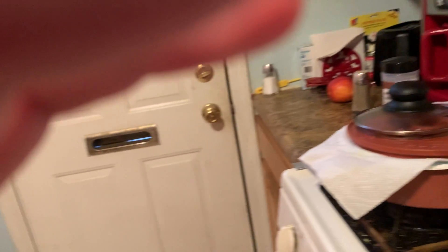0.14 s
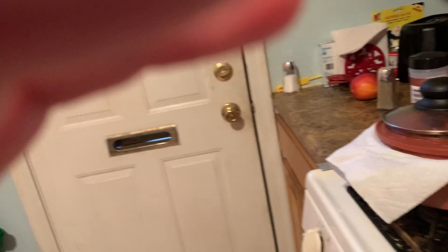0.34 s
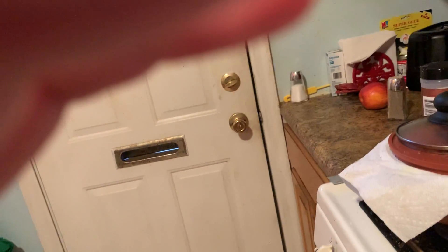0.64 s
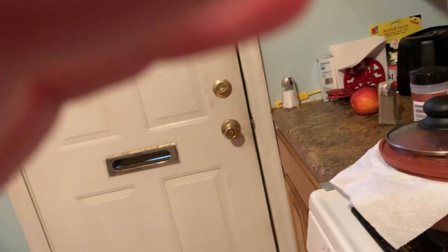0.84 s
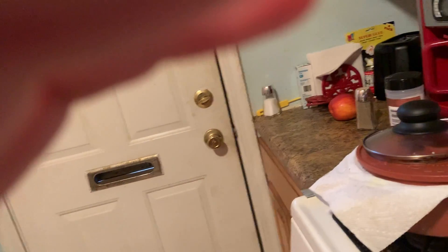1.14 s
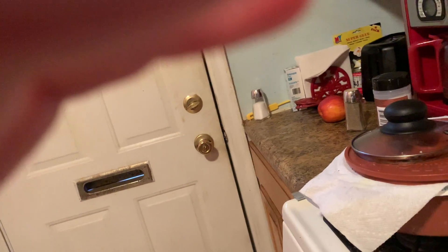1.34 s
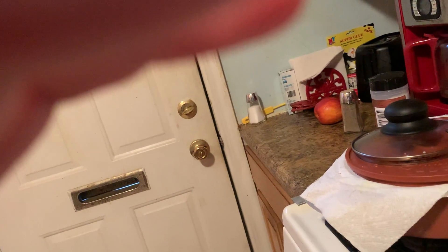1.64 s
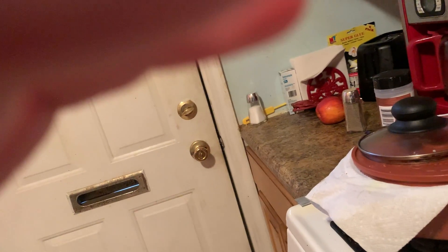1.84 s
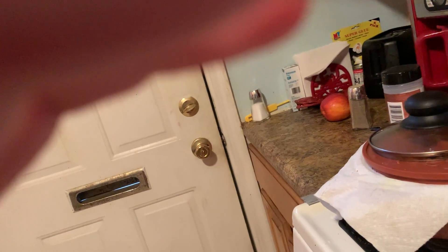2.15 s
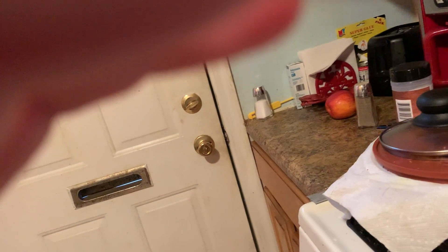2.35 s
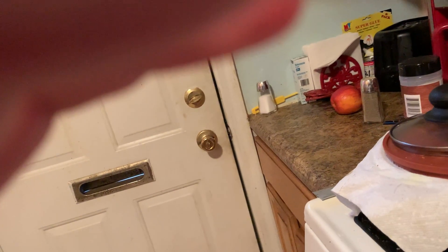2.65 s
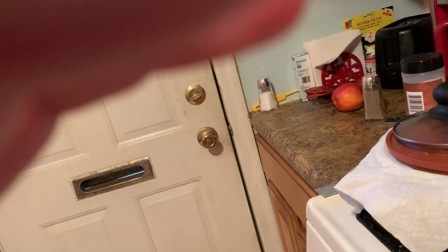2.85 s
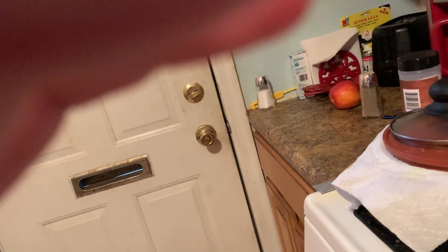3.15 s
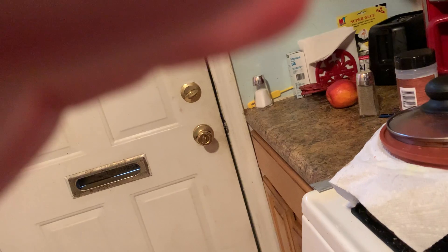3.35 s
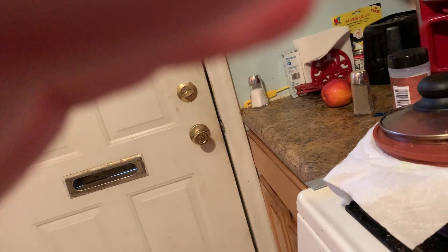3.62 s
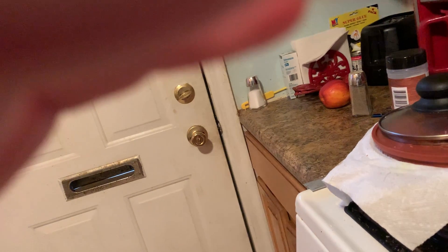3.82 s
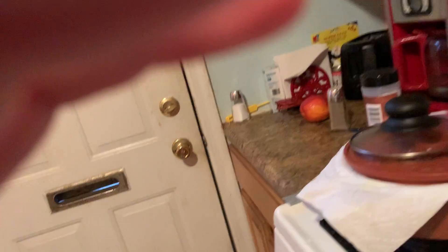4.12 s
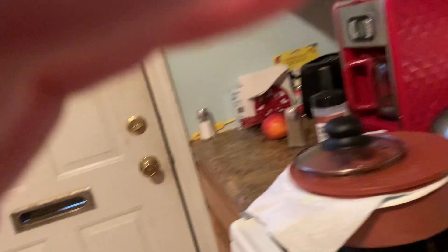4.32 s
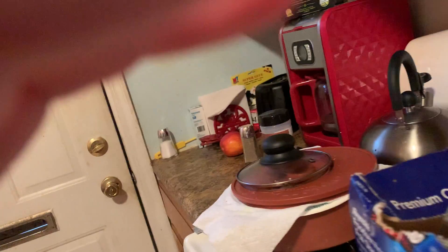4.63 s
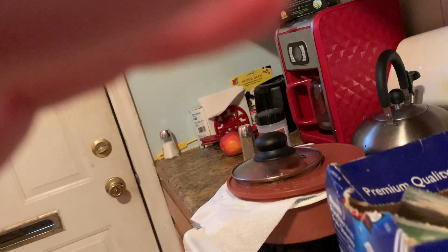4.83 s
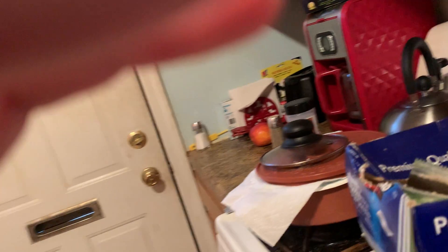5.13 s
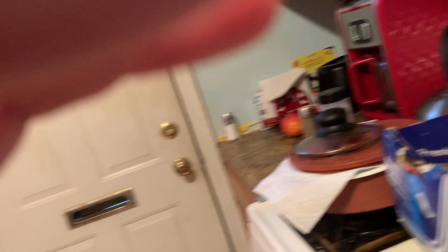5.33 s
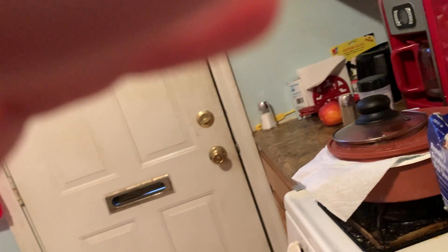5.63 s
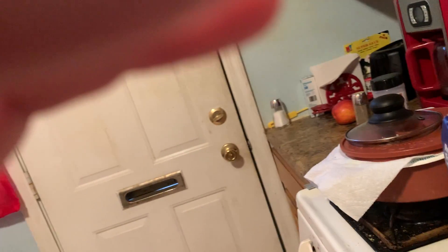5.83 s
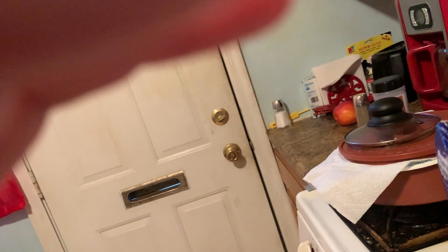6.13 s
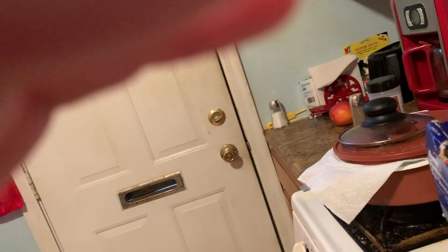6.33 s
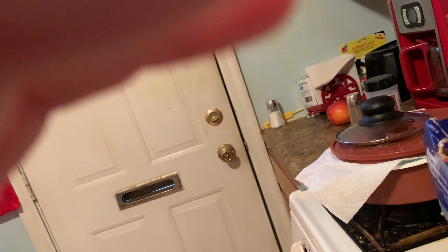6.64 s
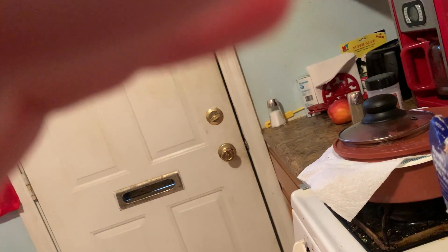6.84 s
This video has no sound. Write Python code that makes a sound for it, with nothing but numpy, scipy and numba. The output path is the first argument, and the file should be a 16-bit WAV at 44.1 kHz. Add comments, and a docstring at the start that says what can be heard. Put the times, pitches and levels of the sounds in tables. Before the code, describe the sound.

Quiet small kitchen with a steady low rumble, picked up by a hand-held phone. Gritty shoe scuffs open, then scattered faint taps and soft floorboard thuds. Midway a cupboard door bangs shut in a very quick double blow, loud and woody with a brief catch rattle. Under a second later a hard object clacks down, bounces and rumbles to rest. Near the end come crisp small clicks and brighter scuffs.

```python
"""A quiet kitchen heard through the two ports of a hand-held phone. A cupboard door bangs shut with a double
blow; a hard object is set down, bounces and rumbles to rest: both are contact noise over struck modes. Soles
scuff (grit sticking and slipping) and tick as they catch again, small things tap (click and knock), floorboards
thud under shifting weight (uneven slips, slow sine bumps). Everything rings in the small room (decaying noise
bands), over the steady rumble of the house (shaped noise)."""
import sys
import numpy as np
from scipy import signal
from scipy.fft import rfft, irfft
from scipy.io import wavfile
from scipy.ndimage import uniform_filter1d
from numba import njit

SR = 44100
rng = np.random.default_rng(int(sys.argv[2]) if len(sys.argv) > 2 else 0)


def bounce(signal):
    """Save signal as a 16-bit WAV file at the path given by the first command-line argument."""
    frames = np.transpose(np.atleast_2d(signal))
    limited = np.clip(frames, -1, 1)
    pcm = np.round(limited * 32767).astype(np.int16)
    wavfile.write(sys.argv[1], SR, pcm)


N = 307377
T = np.arange(N) / SR


# Door blows. Each row: start in seconds, crack peak in dB, body level in dB, crack colour in Hz, body low-pass in Hz.
DOOR_BLOWS = [(3.477, -24, -15.5, 1706, 329), (3.5183, -19.5, -12.5, 3994, 16000)]
# Door modes. Each row: frequency in Hz, relative level in dB, t60 in seconds.
DOOR_MODES = [(119.8, 7, 0.33), (210, -1, 0.031), (235, 8, 0.32), (268.7, 7, 0.28), (302.7, 15.5, 0.28),
              (420, -5, 0.1), (441, -1, 0.37), (478, 2.5, 0.15), (520, 4, 0.09), (610, -8, 0.22),
              (687, -2, 0.17), (730, -7.5, 0.1), (792, -9.5, 0.31), (897, -8, 0.2), (1012, -12.5, 0.18),
              (1228, -5.5, .2), (1340, -11, 0.099), (1450, -11, 0.099), (1736, -3, 0.097), (1940, -12, .15),
              (2415, -11.5, 0.1478)]
# Floor and frame answer. Each row: frequency in Hz, level re body in dB, t60 in seconds, rise constant in seconds.
DOOR_BOOM = [(59.8, -7, 0.47, 0.13), (93.8, -13.5, 0.19, 0.048), (147, -11.5, 0.2, 0.0026),
             (172.6, -16.5, 0.52, 0.038), (217, -17.5, 0.53, 0.043)]
# Noisy shake. Each row: centre in Hz, level re body in dB, t60 in seconds, rise constant in seconds.
DOOR_THUMP = [(260.3, -9.5, 0.36, 0.00063), (745, -8.5, 0.14, 0.0031), (1780, -10.5, 0.084, 0.0036),
              (6000, -25, 0.031, 0.00061), (10210, -30.5, 0.051, 0.00086), (13500, -26.5, 0.08, 0.0013)]
LATCH_HZ, LATCH_OVER_CRACK_DB = 5720, -3


def cupboard_door():
    """Two blows excite the door, floor and frame; the catch rings briefly with each."""
    out = blows(DOOR_BLOWS, DOOR_MODES, DOOR_BOOM, DOOR_THUMP, crack_t60_s=0.033, push_s=0.0068)
    for start_s, crack_db, *_ in DOOR_BLOWS:
        latch = click(LATCH_HZ, 0.35, 0.021)
        add(out, start_s, undb(crack_db + LATCH_OVER_CRACK_DB) * latch)
    return out


# Object contacts. Each row: start in seconds, crack peak in dB, body level in dB, crack colour in Hz,
# body low-pass in Hz.
OBJECT_BLOWS = [(4.3095, -44, -34.5, 900, 1210), (4.3156, -19.5, -20, 2200, 16000),
                (4.3785, -32, -29.5, 1600, 2600), (4.4024, -53, -43, 1850, 4020),
                (4.43, -49, -43.5, 1200, 3000), (4.5542, -54, -33.5, 1500, 590),
                (4.5655, -49, -35.5, 1290, 800), (4.592, -64, -39, 1310, 600),
                (4.6185, -55.5, -38.5, 1300, 800), (4.645, -65, -40.5, 1300, 630)]
# Object modes. Each row: frequency in Hz, relative level in dB, t60 in seconds.
OBJECT_MODES = [(353.4, -4.5, 0.11), (432.4, 0.5, 0.046), (545, -3.5, 0.06), (686.7, -1, 0.13),
                (845, -2.5, 0.037), (1084, 7, 0.03), (1265, 1, 0.063), (1365, 1, 0.025), (1700, 2, 0.018),
                (2180, -1, 0.025), (2740, -9, 0.019), (2945, -13, 0.052), (3400, -10, .02),
                (4030, -10.5, 0.031)]
# Low answer. Each row: frequency in Hz, level re body in dB, t60 in seconds, rise constant in seconds.
OBJECT_BOOM = [(63.4, -18.5, 0.61, 0.0072), (98, -3, 0.19, 0.019), (169, 4, 0.084, 0.02)]
# Noisy shake. Each row: centre in Hz, level re body in dB, t60 in seconds, rise constant in seconds.
OBJECT_THUMP = [(295, -8, 0.19, 0.0054), (620, -17, 0.14, 0.0033), (1150, -7.5, 0.064, 0.0014),
                (4500, -44, 0.012, .0005), (7050, -11, 0.035, 0.0007), (9100, -12.5, 0.03, 0.00047),
                (13900, -28, 0.04, 0.0007)]


def object_set_down():
    """A hard object lands, bounces and comes to rest, its modes pushed faster than the door's."""
    return blows(OBJECT_BLOWS, OBJECT_MODES, OBJECT_BOOM, OBJECT_THUMP, crack_t60_s=0.002, push_s=0.00035)


CRACK_SPREAD = 2.2  # contact click width / centre


def blows(events, modes, boom, thump, crack_t60_s, push_s):
    """Each blow cracks, pushes the same modes in other proportions and shakes what stands around."""
    out, t = np.zeros(N), T[:SR // 2, None]
    hz, db, t60_s = np.transpose(modes)
    low_hz, low_db, low_t60_s, low_rise_s = np.transpose(boom)
    low_envelope = undb(low_db - 60 * t / low_t60_s) * (1 - np.exp(-t / low_rise_s))
    lows = (low_envelope * np.sin(2 * np.pi * low_hz * t)).sum(1)
    sign = (-1) ** np.arange(len(hz))  # neighbouring modes move in opposite senses
    for start_s, crack_db, body_db, crack_hz, top_hz in events:
        share = rng.standard_normal(len(hz))
        mode_gain = undb(db + 0.36 * share - 60 * t / t60_s)
        ring = (mode_gain * sign * np.sin(2 * np.pi * hz * t)).sum(1)
        first_20_ms = ring[:SR // 50]
        ring = ring * (1 - np.exp(-t[:, 0] / push_s)) / np.sqrt(np.mean(first_20_ms ** 2))
        shake = sum(undb(shake_db) * click(shake_hz, 1.6, shake_t60_s, rise_s)
                    for shake_hz, shake_db, shake_t60_s, rise_s in thump)
        body = undb(-6.0) * ring + undb(1.5) * (shake + lows)
        dulled = signal.lfilter(*signal.butter(2, top_hz, fs=SR), body)
        add(out, start_s, undb(body_db) * dulled)
        add(out, start_s, undb(crack_db) * click(crack_hz, CRACK_SPREAD, crack_t60_s))
    return out


# Small taps, and from 6.07 s the ticks of a sole catching as it starts again. Each row: start in seconds, click
# peak in dB, # click colour in Hz, wooden body level in dB, body in Hz, body t60 in seconds, high ring in Hz,
# high ring re body in dB.
TAPS = [(1.1179, -41.5, 2440, -40.5, 392.8, 0.06, 1280, -1),
        (1.458, -50.5, 1150, -47.5, 326, .03, 1170, -16), (1.985, -55, 1200, -52.5, 218.7, .03, 680, 2.5),
        (2.0694, -48, 5160, -41.5, 383, 0.1, 1500, -14),
        (2.5535, -50.5, 4540, -55.5, 220, 0.033, 2560, -18), (2.6312, -45.5, 1270, -40, 433, 0.057, 820, 1),
        (3.3851, -47, 1450, -44.5, 227, .03, 950, -10.5), (5.7247, -83, 7000, -57, 221.3, .03, 1980, -28),
        (5.8272, -85, 5600, -55, 380, 0.031, 2000, -26),
        (5.9796, -79.5, 6000, -53.5, 223.8, .03, 2000, -27),
        (6.0673, -55, 5870, -56.5, 222, 0.038, 5830, 1), (6.2731, -35.5, 4230, -47.5, 268, 0.037, 5940, 14),
        (6.405, -40, 4270, -59.5, 199, 0.036, 3730, 3), (6.8342, -45.5, 6250, -56.5, 201, 0.037, 3600, 5)]


def taps():
    """A short click over a wooden knock: a quick high ring, a lower one and a duller blur."""
    out, t = np.zeros(N), T[:SR // 2]
    for start_s, click_db, click_hz, body_db, body_hz, body_t60_s, high_hz, high_db in TAPS:
        envelope = undb(-60 * t / body_t60_s) * (1 - np.exp(-t / 0.0011))
        ring = np.sin(2 * np.pi * body_hz * t) * envelope
        high = undb(high_db) * click(high_hz, 0.3, 0.026, 0.00046)
        blur = undb(-3.0) * click(0.58 * body_hz, 1.7, 0.12, 0.0028)
        add(out, start_s, undb(click_db) * click(click_hz, CRACK_SPREAD, 0.025, 0.0012))
        add(out, start_s, undb(body_db) * (ring + high + blur))
    return out


# Sole strokes. Each row: start in seconds, length in seconds, level at start in dB, level at end in dB,
# treble re level in dB, lows and low mids re level in dB, bright resonance in Hz, fall between slips in dB.
SCUFFS = [(0.0, 0.052, -44, -47.5, -5, 0, 5760, -8), (0.07, 0.11, -55, -58.5, -5.5, -3.5, 3380, 1),
          (0.215, 0.019, -55.5, -60.5, -8.5, -1, 5600, -1), (0.26, 0.089, -60, -60, -8.5, 1, 6100, -1),
          (0.36, 0.03, -69, -66, -8, -3, 4400, -15), (0.53, 0.026, -74, -64, -16, 4.5, 3000, 0.5),
          (1.13, 0.1, -79, -67.5, -16, 0, 3470, 1), (1.352, 0.074, -66.5, -65.5, -10.5, 2, 3730, 7),
          (1.64, 0.013, -73.5, -81.5, -31, 1, 3600, 4), (1.82, 0.21, -84, -78, -9, -18, 4300, 0.5),
          (2.075, 0.014, -58.5, -94, -24, 6, 4800, 2.5), (2.32, 0.041, -68.5, -68, -40, 4.5, 5130, -5),
          (2.995, 0.041, -69.5, -74, -10, 3.5, 4270, 4.5), (3.31, 0.13, -81, -59, -14, 9, 3170, 4.5),
          (3.72, 0.64, -69, -86.5, -14.5, 8, 3650, -1.5), (6.072, 0.14, -58, -54.5, -12.5, -3, 5910, 10.5),
          (6.225, 0.028, -53.5, -51.5, -13, -2, 5900, 6), (6.277, 0.021, -49.5, -49, -5, 0, 4320, 9.5),
          (6.41, 0.085, -58.5, -50, -10.5, -4.5, 4200, 14.5),
          (6.56, 0.057, -53.5, -53.5, -14.5, 0, 4010, 2), (6.834, 0.019, -63.5, -62.5, -36, -3, 6500, 14)]
# Sole resonances. Each row: centre in Hz, width in Hz, gain in dB.
SOLE = [(1150, 360, -4.5), (1530, 250, -1.5), (1900, 160, -0.5), (2420, 71, -14.5), (3408, 730, -1),
        (4070, 300, -3.5), (5743, 53, 0), (8260, 310, -3), (9660, 2200, 2.5), (13500, 900, 0)]
# Grit spectrum. Each row: frequency in Hz, density in dB per Hz.
GRIT_COLOUR = [(410, -13), (700, -6.5), (807, -10.5), (1130, -6), (1900, -11), (3070, -13.5), (3970, -8.5),
               (5020, -7.5), (5790, -11), (7220, -5), (10400, -2.5), (12000, -2), (13600, -5.5),
               (15500, -30.5)]
SCUFF_RISE_S, SCUFF_FADE_S = .035, 0.21  # over 60 dB
CHATTER_HZ = 90  # nominal stick-slip rate
BRIGHT_WIDTH = .065  # width / centre
PATCHY_DB, SOLE_WANDER_DB = 1.5, 2.5  # scale of the random walks: band levels, each resonance
PING_DB, PING_WIDTH_HZ = -13, 260  # each release pings the bright resonance


def scuffs():
    """Grit catches and slips under a sole, ringing its short resonances; the brightest differs by stroke."""
    gain, _, treble_db, low_db, bright_hz, chatter_db = gestures(SCUFFS, SCUFF_RISE_S, SCUFF_FADE_S)
    grains_db = np.minimum(5.5 * rng.exponential(size=N), 16) * (rng.random(N) < .08)
    grit = rng.standard_normal(N) * undb(grains_db + 0.28 * walk(250))
    cycle = np.cumsum(CHATTER_HZ * undb(1.5 * walk(60)) / SR) % 1
    grit = grit * undb(chatter_db * (0.67 - cycle))
    rub = unit(colour(grit, GRIT_COLOUR))
    rub = rub + sum(band(rub, hz, width_hz) * undb(db + SOLE_WANDER_DB * walk(30)) for hz, width_hz, db in SOLE)
    bright = band(rub, bright_hz, BRIGHT_WIDTH * bright_hz)
    rub = rub + undb(0.39 * chatter_db - 2.0) * bright  # harder slips ring it more
    splits = ((2350, "low"), ((2350, 6750), "band"), (6750, "high"))  # Hz
    low, mid, top = (unit(signal.sosfilt(signal.butter(4, edge_hz, kind, fs=SR, output="sos"), rub))
                     for edge_hz, kind in splits)
    releases = (np.diff(cycle, prepend=0) < 0) * undb(3.0 * rng.standard_normal(N))
    pings = unit(band(band(releases, bright_hz, PING_WIDTH_HZ), bright_hz, 1500.0))
    mid = mid + undb(PING_DB + 0.72 * chatter_db) * pings
    wander = [undb(PATCHY_DB * walk(25)) for _ in range(3)]  # pressure and colour
    return gain * (wander[0] * mid + wander[1] * undb(low_db) * low + wander[2] * undb(treble_db) * top)


# Floorboards and things rocking on them. Each row: start in seconds, length in seconds, level at start in dB,
# level at end in dB, first centre in Hz, woody edge re level in dB.
THUDS = [(1.05, 0.031, -48, -75, 92, -12), (1.615, 0.091, -52, -75, 102, -37),
         (1.685, 0.14, -49.5, -56.5, 174, -14), (1.99, 0.058, -54.5, -60, 116, -9.5),
         (2.08, 0.017, -57.5, -52, 208, -15), (2.64, 0.055, -49, -50, 260, -2),
         (4.555, 0.096, -46, -46, 138, -25), (4.7, 0.12, -69, -63, 119, -20),
         (5.15, 0.2, -62.5, -64.5, 98.5, -22.5), (5.46, 0.041, -55, -57.5, 130, -10)]
THUD_RISE_S, THUD_FADE_S = 0.025, 0.083  # over 60 dB
THUD_SAG_OCTAVES_PER_S = 2.3  # centre sinks as the weight settles


def thuds():
    """Boards shift in uneven slips, nominally 55 a second, each a soft low bump with a woody edge."""
    gain, age_s, first_hz, edge_db = gestures(THUDS, THUD_RISE_S, THUD_FADE_S)
    hz = first_hz * 2 ** (-THUD_SAG_OCTAVES_PER_S * age_s)
    slipped = np.floor(np.cumsum(55 * undb(2.7 * walk(40)) / SR))
    slips = np.diff(slipped, prepend=0) * undb(2.8 * rng.standard_normal(N))
    slips = slips + 0.0087 * rng.standard_normal(N)
    slips = signal.fftconvolve(slips, np.hanning(SR // 1000), "same")  # 1 ms push
    low = unit(band(band(slips, hz, 1.0 * hz), hz, 2.3 * hz) / np.sqrt(hz))
    edge = unit(band(band(slips, 690.0, 950.0), 660.0, 1300.0))
    return uniform_filter1d(gain, SR // 200) * (low + undb(edge_db) * edge)  # 5 ms smoothing


# Deep soft bumps as the floor gives. Each row: start in seconds, length in seconds, peak in dB, first pitch in Hz,
# last pitch in Hz.
BUMPS = [(1.47, 0.11, -48.5, 55, 50), (1.603, 0.074, -49, 80, 71.5), (1.682, 0.071, -46.5, 240, 232),
         (1.715, .05, -43, 151, 143), (1.75, .055, -44, 106.9, 102.7), (1.755, 0.062, -48.5, 198.6, 192),
         (1.77, .13, -50, 52.05, 57.9), (1.82, 0.077, -50.5, 203, 190.8), (1.992, 0.062, -50, 89.3, 78.7),
         (2.638, .055, -43, 243.7, 227), (2.646, 0.043, -46.5, 164.5, 158),
         (4.568, 0.05, -42.5, 95.3, 105.2), (4.612, .06, -39, 122.4, 116.3), (4.6, .1, -47.5, 62.4, 58.05),
         (5.197, 0.18, -52.5, 57, 55.3)]


def bumps():
    """A few slow sine cycles that swell, glide in pitch and fade."""
    out = np.zeros(N)
    for start_s, length_s, db, first_hz, last_hz in BUMPS:
        part = T[:int(length_s * SR)] / length_s
        turns = np.cumsum(first_hz * (last_hz / first_hz) ** part) / SR
        add(out, start_s, undb(db) * np.sin(np.pi * part) * np.sin(2 * np.pi * turns))
    return out


# House rumble spectrum. Each row: frequency in Hz, density in dB per Hz.
HOUSE = [(20, -43.5), (36, -22.5), (55, -1.5), (90, -10), (160, -13.5), (230, -12), (300, -14),
         (480, -26.5), (600, -22.5), (800, -24), (1500, -31), (2100, -35.5), (2600, -44.5), (4500, -48.5),
         (9000, -50.5)]
# Humming peaks. Each row: centre in Hz, width in Hz, level in dB.
HUM = [(64.2, 17, -68), (142.1, 5.1, -70), (233, 19, -68), (339.2, 7.6, -72.5), (397.3, 19, -69.5),
       (464.7, 24, -70.5), (736, 87, -72.5), (1133, 28, -78)]
# Capsule noise spectrum. Each row: frequency in Hz, density in dB per Hz.
CAPSULE_HISS = [(300, -30), (1500, -6), (2600, 0), (5000, -10), (10000, -11), (14000, -21)]
HOUSE_DB, CAPSULE_HISS_DB = -59.5, -90


def house():
    """Steady rumble with humming peaks that waver, over the capsules' own faint hiss."""
    air = unit(colour(ports(N), HOUSE)) * undb(HOUSE_DB + 0.79 * walk(3.2))
    noise = ports(N)
    for hz, width_hz, db in HUM:
        hum = unit(np.array([band(band(side, hz, width_hz), hz, 2 * width_hz) for side in noise]))
        air = air + undb(db + 1.9 * walk(4.0)) * hum
    hiss = colour(rng.standard_normal((2, N)), CAPSULE_HISS)
    return air + unit(hiss) * undb(CAPSULE_HISS_DB)


# Reflection bands. Each row: centre in Hz, nominal t60 in seconds, relative level in dB.
ROOM = [(59.63, 0.2, -14), (137, 0.48, 2), (257, 0.38, 6), (560, 0.31, 9.5), (965, 0.18, 12),
        (1380, 0.25, 8), (2130, 0.33, 8.5), (2950, 0.2, 5), (3970, 0.29, 8), (6200, 0.24, 4.5),
        (7900, 0.16, -2), (9080, 0.31, 3.5), (14600, 0.22, -17.5)]


def kitchen(x, wet_db, build_s=0.0006):
    """Direct sound plus reflections that build up and die away, each band at its own pace."""
    t = T[:SR // 2]
    # evened while decaying, then the decay is undone a little faster than it was applied, leaving a slow rise
    noise = evened(ports(len(t)) * undb(-60 * t / 0.32)) / undb(-60 * t / 0.28)
    tail = 0
    for hz, t60_s, db in ROOM:
        envelope = (1 - np.exp(-t / build_s)) * undb(-60 * t / t60_s)
        part = envelope * np.array([band(band(side, hz, hz), hz, hz) for side in noise])
        tail = tail + undb(db) * part * np.sqrt(hz / SR / np.sum(part ** 2, axis=1, keepdims=True))
    heard = x + undb(wet_db) * signal.fftconvolve(x[None], tail, axes=1)[:, :N]
    return unit(heard) * np.sqrt(np.mean(x ** 2) * (1 + undb(2 * wet_db)))


EVEN_HZ, TREND_HZ = 70, 700  # spans: peaks levelled, colour kept


def evened(tail):
    """Many surfaces fill in one another's gaps: level the chance peaks of a tail's spectrum."""
    size = tail.shape[1]
    spectrum = rfft(tail, 2 * size)
    power = np.abs(spectrum) ** 2
    fine, trend = (uniform_filter1d(power, int(hz * 2 * size / SR)) for hz in (EVEN_HZ, TREND_HZ))
    return irfft(spectrum * np.sqrt(trend / fine), 2 * size)[:, :size]


# Diffuse-field likeness. Each row: frequency in Hz, power share common to both ports as a fraction.
LIKENESS = [(60, .9), (130, .4), (280, .35), (700, .5), (1500, .35), (4000, .15), (12000, .1)]


def ports(size):
    """Diffuse noise at two ports: a common part and a part of its own for each."""
    common, left, right = rng.standard_normal((3, size))
    share = np.clip(on_log(LIKENESS, size), 0, 1)
    return irfft(np.sqrt(share) * rfft(common) + np.sqrt(1 - share) * rfft([left, right]), size)


def click(hz, spread, t60_s, rise_s=0.00012):
    """A decaying burst of contact noise around one colour, peak 1."""
    t = T[:SR // 2]
    burst = rng.standard_normal(len(t)) * undb(-60 * t / t60_s) * (1 - np.exp(-t / rise_s))
    burst = band(band(burst, hz, spread * hz), hz, spread * hz)
    return burst / np.abs(burst).max()


def gestures(events, rise_s, fade_s):
    """Each event rises, slides first to last level and fades; the loudest lends its age and columns."""
    start_s, length_s, first_db, last_db, *rest = np.array(events).T[:, :, None]
    age_s = T - start_s
    db = first_db + (last_db - first_db) * np.clip(age_s / length_s, 0, 1)
    db = db - 60 * np.clip(np.maximum(-age_s / rise_s, (age_s - length_s) / fade_s), 0, 5)
    lead = db.argmax(0)
    held_s = np.clip(age_s, 0, length_s)[lead, np.arange(N)]
    columns = [uniform_filter1d(column[lead, 0], SR // 200) for column in rest]
    return [undb(db.max(0)), held_s] + columns


def walk(rate_hz):
    """Random levels held 1 / rate and slewed; spread about 1.6."""
    k = int(SR / rate_hz)
    return 2.0 * uniform_filter1d(np.repeat(rng.standard_normal(N // k + 1), k), k)[:N]


@njit
def svf(x, hz, width_hz):
    """State-variable band-pass with a moving centre, gain 1 there."""
    y, b, l = np.empty(len(x)), 0., 0.
    for i in range(len(x)):
        g, k = np.tan(np.pi * hz[i] / SR), width_hz[i] / hz[i]
        v = (b + g * (x[i] - l)) / (1 + g * (g + k))
        b, l, y[i] = 2 * v - b, l + 2 * g * v, k * v
    return y


def band(x, hz, width_hz):
    """Band-pass with fixed or moving settings."""
    return svf(x, hz + np.zeros(len(x)), width_hz + np.zeros(len(x)))


def undb(db):
    """Decibels to amplitude."""
    return 10 ** (np.asarray(db) / 20)


def unit(x):
    """Scale to RMS 1."""
    return x / np.sqrt(np.mean(x ** 2))


def on_log(table, size):
    """A (Hz, value) table read at every bin of a transform."""
    hz, value = np.transpose(table)
    return np.interp(np.log(np.arange(size // 2 + 1) * SR / size + 1), np.log(hz), value)


def colour(x, table):
    """Shape the spectrum by (Hz, dB) points."""
    return irfft(rfft(x) * undb(on_log(table, x.shape[-1])), x.shape[-1])


def add(out, start_s, sound):
    """Mix a sound in at a time."""
    i = int(start_s * SR)
    out[i:i + len(sound)] += sound[:N - i]


def pan(left_minus_right_db):
    """Left and right gains."""
    return undb([[left_minus_right_db / 2], [-left_minus_right_db / 2]])


def scene():
    """Each source in the room at its own wet level, over the house."""
    near = kitchen(cupboard_door(), -3.0) * pan(-1)
    near = near + kitchen(object_set_down(), -7.0) * pan(-1.5)
    near = near + kitchen(taps(), 1.1)
    near = near + kitchen(thuds() + bumps(), -12.5)
    near = near + kitchen(scuffs(), -7.5)
    return near + house()


# Port colour difference. Each row: frequency in Hz, left minus right in dB.
BALANCE_DB = [(60, -1.5), (110, -4), (200, -2), (380, -2.5), (700, 0.5), (1290, 0.5), (2380, 1.5),
              (4400, 1), (8120, -4.5), (15000, 0)]
# Port phase. Each row: frequency in Hz, left port lag beyond its delay in radians.
PORT_TURN = [(60, 0.14), (130, 0.49), (290, -0.011), (700, 0.41), (1640, 1.1), (3200, 0.16), (4300, -0.23),
             (6300, -1), (14000, 2.7)]
PORT_LAG_SAMPLES, TOP_HZ = 16, 16600


def record(dry):
    """Sound reaches the left port later, round the case; port colours differ, the high treble is uneven and cut."""
    size = dry.shape[1]
    lag_rad = 2 * np.pi * np.arange(size // 2 + 1) * PORT_LAG_SAMPLES / size + on_log(PORT_TURN, size)
    tilt_db = on_log(BALANCE_DB, size) / 2
    treble_db = on_log([(10500, 5.0), (11400, 3.0), (12000, -15.5), (12700, 10.5), (14200, 6.0),
                        (14700, -21.5), (16000, -19.0)], size)  # Hz, dB
    gain = undb(np.array([tilt_db, -tilt_db]) + treble_db)
    turn = np.array([np.exp(-1j * lag_rad), lag_rad ** 0])  # right port unturned
    heard = irfft(rfft(dry) * gain * turn, size)
    return signal.sosfilt(signal.ellip(8, .2, 70, TOP_HZ, fs=SR, output="sos"), heard)


dry = scene()
out = record(dry)
bounce(out)
```